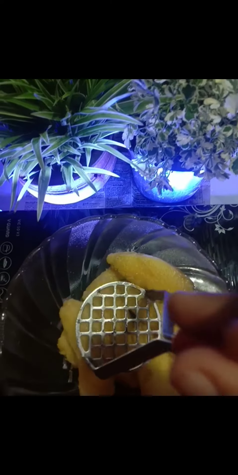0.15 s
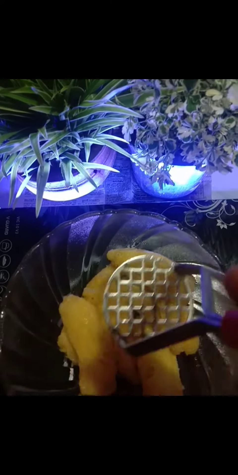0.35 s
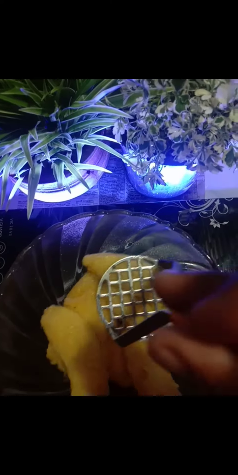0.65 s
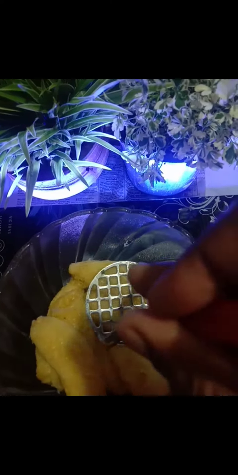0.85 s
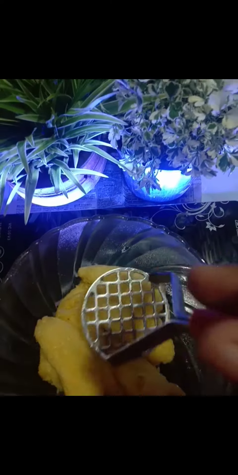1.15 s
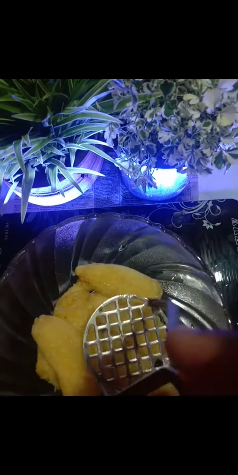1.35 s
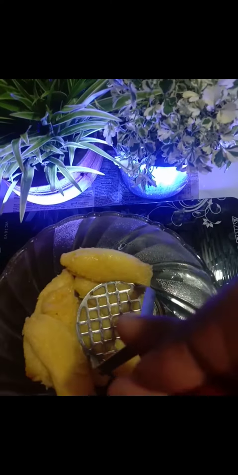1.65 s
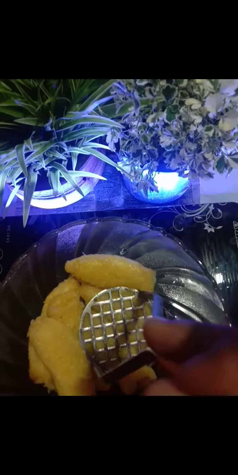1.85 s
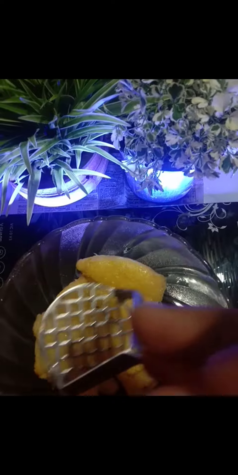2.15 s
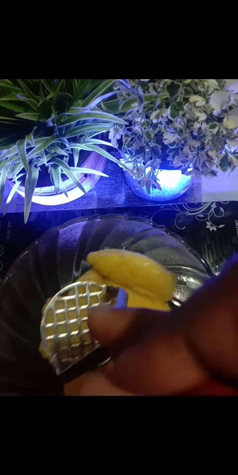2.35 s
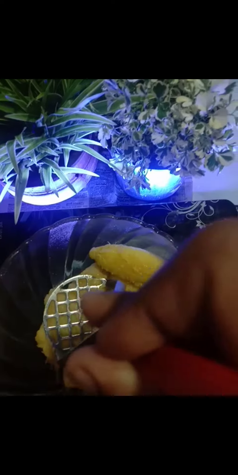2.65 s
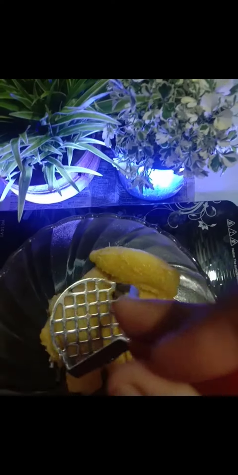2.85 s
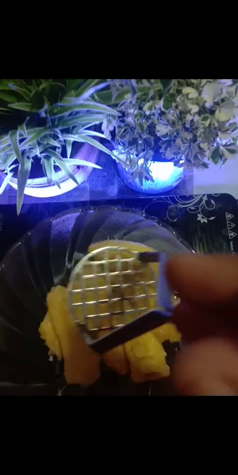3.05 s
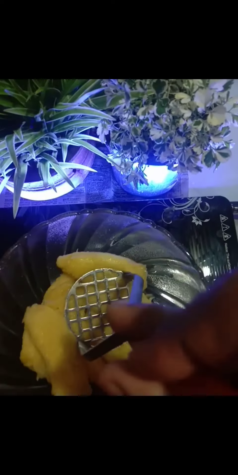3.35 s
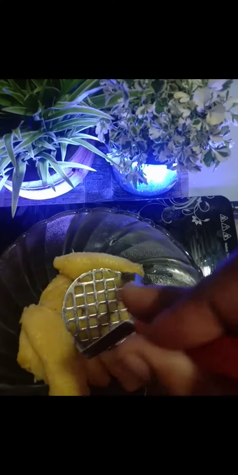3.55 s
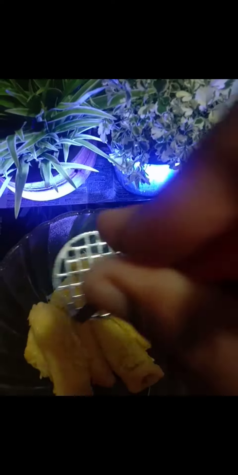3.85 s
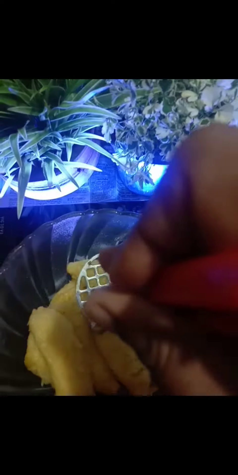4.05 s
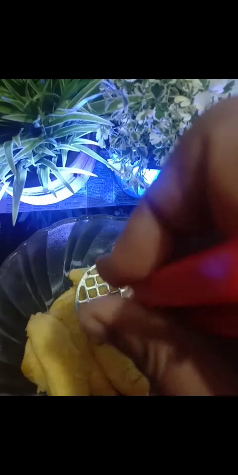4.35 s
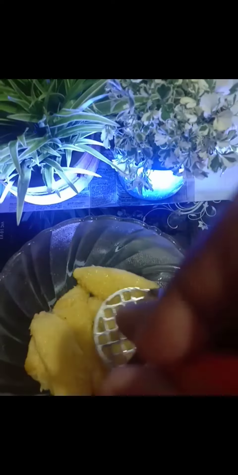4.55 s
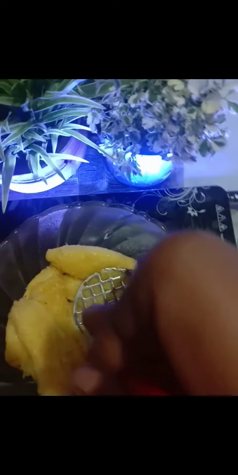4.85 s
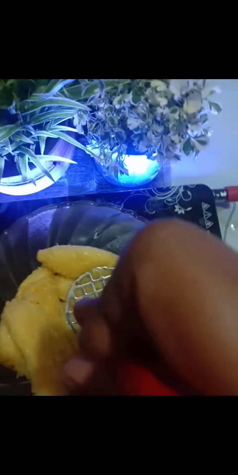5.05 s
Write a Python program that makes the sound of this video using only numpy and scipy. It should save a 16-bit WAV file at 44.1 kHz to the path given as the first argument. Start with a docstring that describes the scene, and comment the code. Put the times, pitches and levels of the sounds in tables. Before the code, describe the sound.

Close to the microphone in a quiet kitchen, a steel masher presses soft fruit in a glass bowl. Faint squelches come with irregular, crisp little wet clicks and tiny air pops. After one soft bump, the masher strikes the glass twice near the end: first a loud, ringing clink, then a duller one, each briefly rattling the bowl on the counter. Faint room tone runs underneath.

```python
"""A steel masher presses soft fruit in a glass bowl, close to a microphone in a quiet kitchen.
Pulp squelches through the grid, wet films snap as they part from it, trapped air pops.
Twice the masher strikes the glass: the bowl rings, rattles on the counter, and the room answers.
One soft bump on the pulp and faint rubs on the glass, over steady room tone."""
import sys
import numpy as np
from scipy import signal
from scipy.fft import rfft, irfft
from scipy.io import wavfile
from scipy.ndimage import map_coordinates

SR = 44100
rng = np.random.default_rng(int(sys.argv[2]) if len(sys.argv) > 2 else 0)


def generate_wav(sig):
    """Save sig (samples, or channels by samples) to the path in sys.argv[1] as 16-bit PCM at SR."""
    pcm = np.round(np.clip(np.atleast_2d(sig).T, -1, 1) * 32767).astype(np.int16)
    wavfile.write(sys.argv[1], SR, pcm)


N = 228482

# squeezes of pulp: t/s, half length/s, level/dB, centre f/Hz
SQUEEZES = [(0.127, 0.021, -65.5, 1290), (0.612, .015, -66.5, 1480), (0.772, 0.084, -70, 1480),
            (1.074, 0.016, -62, 1880), (1.393, 0.024, -62.5, 1120), (1.454, 0.019, -62.5, 1950),
            (1.55, .022, -65, 2040), (1.846, 0.084, -72, 1080), (2.341, .017, -59, 1260),
            (2.389, .013, -57, 2000), (2.522, 0.013, -67.5, 3350), (2.834, .068, -79, 3400),
            (3.123, .014, -76, 2980), (3.26, .06, -70, 1140), (3.422, 0.092, -72.5, 920),
            (3.589, 0.035, -62, 1950), (4.34, 0.049, -70.5, 3000)]
# fizz and spray, coloured by the microphone's 7.5 kHz resonance: f/Hz, level/dB
FIZZ_SPECTRUM = [(2500, -23), (5000, -15), (6300, -11.5), (7500, 3.5), (9000, -15.5), (12500, -21),
                 (15200, -16.5), (16500, -17)]


def pulp():
    """Each squeeze pushes pulp through the grid: gritty bubbles in the bowl's hollows, fine fizz."""
    # resonances of the hollows: f/Hz, level/dB
    hollows = [(450, -30), (800, -3), (1000, -10), (1230, 2), (1700, -12), (2280, 0), (2700, -13),
               (3300, -2), (4300, -9), (5000, 0), (5700, -10), (8000, -22)]
    out, t = np.zeros(N), np.arange(SR // 2) / SR
    for s, half_s, squelch_db, centre_hz in SQUEEZES:
        fizz_db = squelch_db - 6 + 6 * np.log2(centre_hz / 1300)  # finer bubbles: higher, more fizz
        lead_s = min(s, 2 * half_s)
        pressure = np.exp(-((t - lead_s) / half_s) ** 2)
        bubbles = coloured(grains(len(t), per_s=2800, spread_db=6.0), hollows)
        bubbles = coloured(bubbles, hump(centre_hz, skirt_db=-8.5))
        fizz = coloured(grains(len(t), per_s=7200, spread_db=21.0), FIZZ_SPECTRUM)
        add(out, s - lead_s, pressure * (amp(squelch_db) * bubbles + amp(fizz_db) * fizz))
    return room(out, early_db=-8.5, late_db=-16, early_t60_s=0.033)


def film_snaps():
    """Wet films part from the grid: clear snaps, plus a faint stray near each squeeze."""
    # clear snaps: t/s, level/dB, f/Hz, time constant/cycles
    snaps = [(0.073, -27.5, 8900, 0.65), (0.6012, -33, 8500, 0.93), (0.6823, -35.5, 4100, 0.82),
             (0.7297, -38.5, 7100, 0.84), (0.9783, -21.5, 7430, 1.06), (.9953, -35, 7200, 0.66),
             (1.0485, -26, 7440, 0.98), (1.0609, -42, 8550, 0.68), (1.3732, -38, 9000, 0.48),
             (1.4547, -39.5, 7100, 0.55), (1.5128, -20, 7100, 0.96), (1.5449, -40.5, 7250, 2.2),
             (1.6065, -51, 7400, 3.3), (1.8289, -38, 11600, 1.7), (1.8507, -22.5, 7900, 1.1),
             (1.9493, -21.5, 8030, 1.04), (2.0518, -49, 8540, 1.9), (2.3014, -34.5, 7520, 1.6),
             (2.3592, -39.5, 8360, 1.7), (2.3859, -30.5, 6740, 0.49), (2.434, -47.5, 7700, 1),
             (2.5101, -37.5, 8270, 1.1), (2.8112, -43.5, 10600, 0.57), (3.2242, -47, 7850, 1.5),
             (3.2615, -50, 8200, 1.8), (3.2849, -45.5, 9300, 0.82), (3.425, -60, 8700, 2.2),
             (3.5425, -19.5, 7680, 0.81), (3.5647, -26, 7240, 0.7), (3.5945, -34.5, 9750, 0.51),
             (3.6136, -34, 7940, 1.1), (4.2976, -30.5, 8340, 1.06), (4.3242, -47, 10200, 1.7),
             (4.355, -38, 8200, 0.76), (4.374, -54, 9960, 2.1), (4.7214, -48, 7800, 1.2)]
    out, mic_hz = np.zeros(N), 7480
    for s, db, hz, cycles in snaps:
        add(out, s, film_snap(db, hz, cycles, mic_hz))
    for s, *_ in SQUEEZES:
        when, size, pitch = rng.standard_normal(3)
        stray_db, stray_hz = -58.5 - 0.5 * size, mic_hz * 2 ** (.12 * pitch)
        add(out, abs(s + 0.0083 * when), film_snap(stray_db, stray_hz, 0.82, mic_hz))
    return out


def film_snap(db, hz, cycles, mic_hz):
    """A snap rings the microphone near 7.5 kHz and the hollow behind the film, and leaves spray."""
    t = np.arange(SR // 4) / SR
    force_db = db + 42  # relative to a middling snap
    edge_db = min(-20 + 47.5 * np.log2(hz / mic_hz), -4)  # higher snaps sound crisper
    snap = pip(t, hz, cycles, order=2) + amp(edge_db) * pip(t, hz=14500, cycles=2.2)
    spray = coloured(grains(len(t), per_s=3200, spread_db=5.5), FIZZ_SPECTRUM)
    spray *= amp(-57.5 + 0.56 * force_db) * fade(t, 0.065)
    hollow = amp(-65 + 0.27 * force_db) * pip(t, hz=1214, cycles=2)
    return room(amp(db) * snap + spray + hollow, early_db=-27.0, late_db=-11.0, early_t60_s=0.25)


def air_pops():
    """Air pockets in the pulp open and ring briefly."""
    # pockets: t/s, level/dB, f/Hz
    pockets = [(0.6008, -46, 2980), (.9778, -49.5, 850), (1.373, -53.5, 1110), (1.5116, -45.5, 1247),
               (1.513, -40.5, 3970), (1.5473, -58, 2900), (3.542, -49, 1630)]
    out, t = np.zeros(N), np.arange(SR // 10) / SR
    for s, db, hz in pockets:
        add(out, s, amp(db) * pip(t, hz, cycles=2.2))
    return room(out, early_db=-17.5, late_db=-17.5, early_t60_s=.08)


def clinks():
    """Each blow cracks, rattles the bowl and rings the modes of bowl and masher at strengths set by where it
    lands."""
    # masher on glass: t/s, ring/dB, damped share/dB, rattle/dB, rattle t60/s, room tail/dB,
    # crack/dB, crack f/Hz, swell share/0-1
    blows = [(3.8512, 2, -7.5, -18.5, 0.11, -8, -9, 1643, 1),
             (4.5537, -1.5, 7, -18.5, 0.068, -19, -15, 7250, 0)]
    # modes of bowl and masher: f/Hz, t60/s, level in blow 1/dB, level in blow 2/dB
    modes = [(130, .45, -53, -44.5), (333, .5, -38, -41), (410, .45, -43, -45), (777, .56, -26, -34),
             (1013, .65, -44, -55), (1170, .6, -41, -55), (1317, .6, -39, -57), (1375, .56, -36, -57),
             (1451, .5, -35, -56), (1507, .53, -35, -54), (1560, .55, -37, -54), (1778, .8, -23.5, -51),
             (2374, .5, -43, -66), (3043, .5, -20, -30), (3796, .45, -44, -60), (4534, .64, -33.5, -50),
             (5943, .42, -54, -53), (6230, .4, -37, -52), (7036, .36, -55, -54), (7400, .3, -46, -48),
             (8144, .36, -38, -66), (9119, .35, -51, -70), (9932, .3, -50, -68), (10330, .3, -48, -64),
             (12190, .35, -62, -75)]
    # dense short resonances of masher, bowl and counter: f/Hz, level in blow 1/dB, level in blow 2/dB
    rattle_spectra = [(40, -62, -60), (80, -42, -36), (125, -22, -9.5), (190, -11, -5.5), (330, -2.5, 1.5),
                      (520, -6.5, -7.5), (950, -7.5, -9.5), (1450, 0, -5.5), (2300, -6, -19.5),
                      (3100, -16.5, -17.5), (4200, -16, -17), (5200, -20, -22), (7400, -15.5, -12.5),
                      (9800, -23, -32), (13000, -40, -40), (15300, -29, -27)]
    out, t = np.zeros(N), np.arange(SR) / SR
    for k, blow in enumerate(blows):
        s, ring_db, damped_db, rattle_db, rattle_t60_s, tail_db, crack_db, crack_hz, swell_share = blow
        ring = np.zeros(len(t))
        for hz, t60_s, *mode_db in modes:
            ring += amp(mode_db[k]) * struck_mode(t, hz, t60_s, damped_db, swell_share)
        ring *= amp(ring_db) * (1 - fade(t, 0.0089))
        rattle = coloured(rng.standard_normal(len(t)), [(row[0], row[1 + k]) for row in rattle_spectra])
        rattle *= amp(rattle_db) * fade(t, rattle_t60_s) * (1 - fade(t, .006)) ** 2
        crack = amp(crack_db) * push(t - .0016, crack_hz, cycles=1.3)
        add(out, s, ring + room(rattle + crack, early_db=-24, late_db=tail_db, early_t60_s=0.021))
    return out


def struck_mode(t, hz, t60_s, damped_db, swell_share):
    """One mode of bowl or masher decays; reflections pile up and make its level and phase flutter."""
    # flutter depth: f/Hz, scattered share/0-1
    scatter = [(800, 0.45), (1778, .5), (3043, 0.17), (4534, 0.7), (10000, 0.1)]
    pitch_ratio = hz / 2013  # relative to a middling mode
    flutter_hz = 80 * np.sqrt(pitch_ratio)
    scattered = along(scatter, hz) * (1 - fade(t, .4))
    flutter = 1 - scattered + scattered * (wobble(len(t), flutter_hz) + 1j * wobble(len(t), flutter_hz))
    decay = fade(t, t60_s) + amp(-30.0) * fade(t, 3.4 * t60_s)  # the free rim lingers
    # pulp and masher absorb an extra initial share, high modes first
    decay *= 1 + amp(damped_db) * fade(t, 0.32 / pitch_ratio ** 0.26)
    rise = 1 - np.exp(-t * hz)  # about one cycle
    tone = ring_swells(t, hz, swell_share) * np.exp(2j * np.pi * (hz * t + rng.random()))
    return rise * decay * (flutter * tone).real


def ring_swells(t, hz, share):
    """Complex gain of a mode: the ring swells and dips a few times as it fades."""
    # swelling modes: f/Hz, swell rate/Hz, first crest/s, depth/dB
    swells = [(1778, 9, .122, -2), (3043, 14.6, .095, 2.5), (4534, 19, .071, -2), (6230, 27, .085, -8)]
    build_s, depth_t60_s, wander_rad_per_s = 0.062, 2.4, 2.4
    envelope = (1 - np.exp(-(t / build_s) ** 2)) * fade(t, depth_t60_s)
    gain = np.ones(len(t), complex)
    for mode_hz, swell_hz, crest_s, db in swells:
        if abs(mode_hz - hz) < hz * .07:
            drift = wander_rad_per_s * t * wobble(len(t), rate_hz=16)
            phase = 2 * np.pi * swell_hz * (t - crest_s) + drift
            gain += share * amp(db) * envelope * np.exp(-1j * phase)
    return gain


def bump():
    """The masher bottoms out on a cushion of pulp: one dull push and rebound, no ring."""
    at_s, level_db = 3.0719, -32.5
    knock = push(np.arange(N) / SR - at_s, hz=520, cycles=0.27)
    return amp(level_db) * room(knock, early_db=-8, late_db=-19, early_t60_s=0.13)


def rubs():
    """The masher slides on the glass; friction keeps one narrow resonance trembling per stroke."""
    # strokes: t/s, half length/s, level/dB, f/Hz
    strokes = [(0.836, .04, -79, 2220), (1.275, 0.12, -72.5, 792), (2.84, 0.055, -79.5, 4730),
               (2.853, 0.09, -80, 2260), (3.275, .11, -69, 1177)]
    out, t = np.zeros(N), np.arange(N) / SR
    for s, half_s, db, hz in strokes:
        tremble = wobble(N, rate_hz=66) + 1j * wobble(N, rate_hz=66)
        swell = np.exp(-((t - s) / half_s) ** 2)
        out += amp(db) * swell * (tremble * np.exp(2j * np.pi * hz * t)).real
    return out


def room(x, early_db, late_db, early_t60_s):
    """x plus quick reflections from counter and walls, and the kitchen's tail."""
    # kitchen reverberation: f/Hz, t60/s
    decay_times = [(100, 1), (400, 0.82), (1500, 0.73), (4000, 0.67), (8000, 0.06), (15000, 0.54)]
    count = min(len(x), SR)
    t = np.arange(count) / SR
    hz, frame_s, spectra = signal.stft(rng.standard_normal(count), SR, nperseg=256)
    spectra *= fade(frame_s, along(decay_times, hz)[:, None])
    tail = signal.istft(spectra, SR, nperseg=256)[1][:count]
    early = rng.standard_normal(count) * fade(t, early_t60_s)
    response = (amp(early_db) * unit(early) + amp(late_db) * unit(tail)) * (t > .003) / np.sqrt(count)
    return x + signal.fftconvolve(x, response)[:len(x)]


def room_tone():
    """Steady faint noise, strongest in the bass."""
    # quiet kitchen: f/Hz, level/dB
    spectrum = [(15, -34.5), (25, -22.5), (103, -3), (197, -11.5), (226, -15.5), (288, -17), (330, -18),
                (496, -20), (952, -23.5), (1250, -23), (1830, -30), (3410, -32), (6300, -35), (7500, -34),
                (9070, -42), (13500, -41.5), (15200, -40.5), (16500, -43.5)]
    return amp(-67.5) * coloured(rng.standard_normal(N), spectrum)


def pip(t, hz, cycles, order=1):
    """Damped resonance, envelope peak 1 at order * cycles; a higher order rounds the onset."""
    u = t * hz / cycles
    return (u / order) ** order * np.exp(order - u) * np.sin(2 * np.pi * hz * t)


def push(t, hz, cycles):
    """Brief push and rebound centred on t = 0."""
    return np.sin(2 * np.pi * hz * t) * np.exp(-(t * hz / cycles) ** 2)


def grains(count, per_s, spread_db):
    """Random impulses of unequal size."""
    impulses = (rng.random(count) < per_s / SR) * rng.choice([-1, 1], count)
    return impulses * amp(spread_db * np.minimum(rng.standard_normal(count), 2))


def wobble(count, rate_hz):
    """Smooth random curve, rate_hz knots a second."""
    knots = rng.standard_normal(int(count * rate_hz / SR) + 4)
    return map_coordinates(knots, [np.arange(count) * rate_hz / SR])


def hump(hz, skirt_db):
    """Spectrum of a broad resonance, at skirt_db an octave to either side."""
    return [(hz * 2.0 ** octave, abs(octave) * skirt_db) for octave in range(-2, 3)]


def coloured(x, spectrum):
    """x shaped by a (f/Hz, level/dB) spectrum, at rms 1."""
    hz = np.fft.rfftfreq(len(x), 1 / SR)
    return unit(irfft(rfft(x) * amp(along(spectrum, hz)), len(x)))


def along(points, hz):
    """(f/Hz, value) points read on a log axis."""
    f, v = np.transpose(points)
    return np.interp(np.log(hz + 1), np.log(f + 1), v)


def fade(t, t60_s):
    """Free decay, 60 dB down after t60_s."""
    return np.exp(-np.log(1000) * t / t60_s)


def amp(db):
    """Decibels to gain."""
    return 10 ** (np.asarray(db) / 20)


def unit(x):
    """x at rms 1."""
    return x / np.sqrt(np.mean(x ** 2) + 1e-20)


def add(track, s, sound):
    """Mix a sound into the track at time s."""
    part = track[round(s * SR):][:len(sound)]
    part += sound[:len(part)]


def scene():
    """The bowl and its contents over room tone, mono."""
    background = room_tone()
    return (film_snaps() + air_pops() + pulp() + rubs() + clinks() + bump() + background)[None]


def record(dry):
    """The recorder thins the deep bass and cuts off at its band limit."""
    low_hz, top_hz = 45, 15900
    thin = signal.sosfilt(signal.butter(2, low_hz, "high", fs=SR, output="sos"), dry)
    return signal.sosfilt(signal.cheby1(14, .1, top_hz, fs=SR, output="sos"), thin)


dry = scene()
out = record(dry)
generate_wav(out)
```